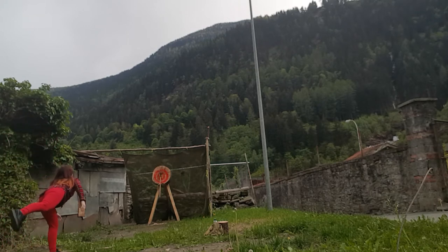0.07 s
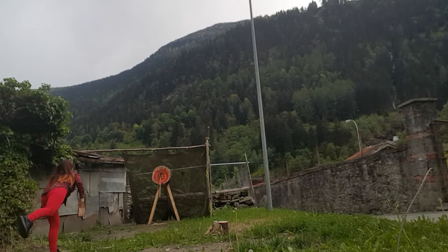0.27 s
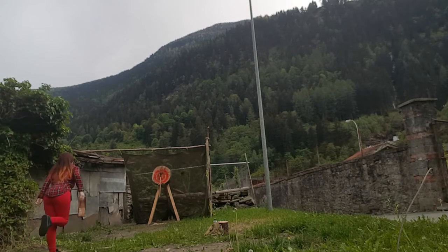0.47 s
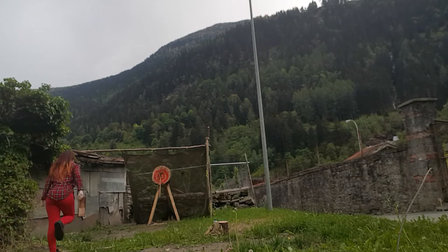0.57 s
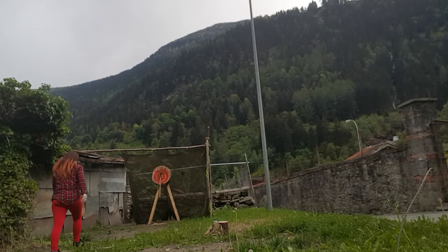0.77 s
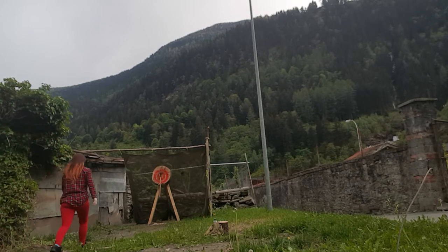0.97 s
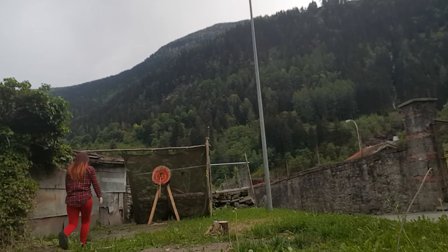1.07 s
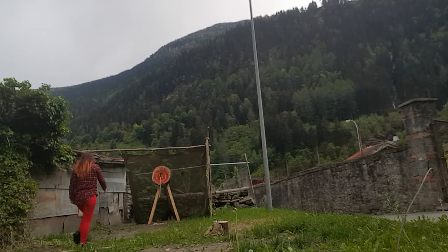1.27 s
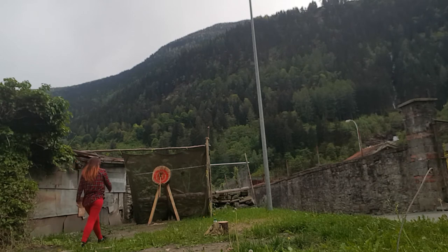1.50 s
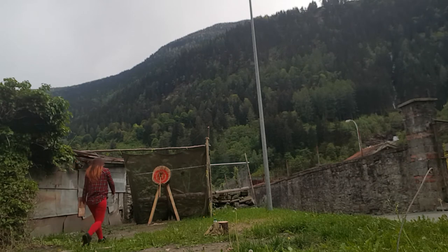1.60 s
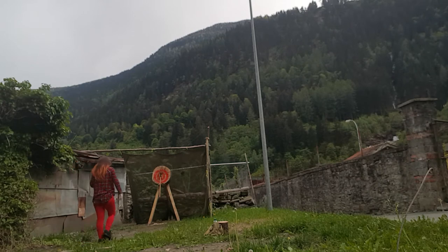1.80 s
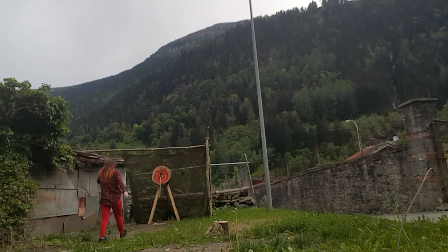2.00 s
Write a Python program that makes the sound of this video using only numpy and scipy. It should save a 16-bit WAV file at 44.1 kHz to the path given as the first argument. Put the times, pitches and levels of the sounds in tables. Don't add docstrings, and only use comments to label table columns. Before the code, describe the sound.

Hard woody thunk of an axe biting into a log target in a quiet open garden

```python
import sys
import numpy as np
from scipy import signal
from scipy.fft import rfft, irfft
from scipy.io import wavfile
from scipy.ndimage import uniform_filter1d

SR = 44100
rng = np.random.default_rng(int(sys.argv[2]) if len(sys.argv) > 2 else 0)


def nominal_scale(level):
    x = np.asarray(level, float) / 20
    return 10 ** x


def file_out(sig):
    cols = np.atleast_2d(sig).T
    lim = np.clip(cols, -1, 1)
    pcm = np.round(lim * 32767).astype(np.int16)
    wavfile.write(sys.argv[1], SR, pcm)


N = 90404


def evened(x):
    return x / np.sqrt(np.mean(x ** 2) + 1e-20)


def read(points, hz):
    f, value = np.transpose(points)
    return np.interp(np.log(hz + 1), np.log(f + 1), value)


def since(start_s):
    return np.maximum(np.arange(N) / SR - start_s, 0)


def ring(start_s, level_db, pitch_hz, t60_s, rise_s):
    t = since(start_s)
    decay = nominal_scale(level_db - 60 * t / t60_s)
    rise = 1 - np.exp(-t / rise_s)
    return -decay * rise * np.sin(2 * np.pi * pitch_hz * t)


def panned(difference_db):
    return nominal_scale([[difference_db / 2], [-difference_db / 2]])


def hiss(colour, same):
    mono_below_hz = 500
    a, b = rfft(rng.standard_normal((2, N)))
    hz = np.fft.rfftfreq(N, 1 / SR)
    same = 1 - (1 - same) * hz ** 2 / (hz ** 2 + mono_below_hz ** 2)
    right = same * a + np.sqrt(1 - same ** 2) * b
    return evened(irfft(np.array([a, right]) * nominal_scale(read(colour, hz)), N))


def wash():
    # hz, level_db (per Hz)
    colour = [(25, -15), (60, -6.5), (200, -6.5), (400, 0), (2300, -4), (4500, -21.5), (7000, -35.5),
              (16000, -49.5)]
    # hz, likeness (0 to 1)
    likeness = [(60, 0.98), (250, 0.91), (600, 0.42), (1400, 1), (3000, 0.32), (6000, 0.26), (12000, .05)]
    # hz, lead_rad
    lead = [(200, 0.0), (520, -0.7), (1120, 1.5), (1890, 2), (3190, 4), (5340, 7.5)]
    # hz, difference_db
    balance = [(60, 0), (150, 2), (380, -0.5), (950, 3), (2380, 3.5), (5980, 5.5), (15000, -3.5)]
    wash_db, swell_db, patch_db = -49, 0.28, 0.1

    frames, hz = N // 256 + 5, np.fft.rfftfreq(1024, 1 / SR)
    a, b, c, d, patches = rng.standard_normal((frames, 513, 5)).T
    patches = uniform_filter1d(patches, size=10, axis=0)
    patches = evened(uniform_filter1d(patches, size=12, axis=1))
    swell = evened(uniform_filter1d(rng.standard_normal(frames), size=24))

    same = np.clip(read(likeness, hz), 0, 1)[:, None]
    left = a + 1j * b
    delayed = left * np.exp(-1j * read(lead, hz))[:, None]
    right = same * delayed + np.sqrt(1 - same ** 2) * (c + 1j * d)
    pan = nominal_scale(read(balance, hz) / 2)[:, None]
    level_db = read(colour, hz)[:, None] + patch_db * patches + swell_db * swell
    z = np.array([left * pan, right / pan]) * nominal_scale(level_db)
    return nominal_scale(wash_db) * evened(signal.istft(z, nperseg=1024, noverlap=768)[1][:, :N])


def bird():
    # start_s, length_s, level_db, start_hz, end_hz
    whistles = [
        (1.12, .02, -63, 2450, 2450),
        (1.16, .18, -62, 2300, 2230),
        (1.605, .025, -62, 2400, 2400),
        (1.64, .02, -63, 2600, 2600),
        (1.68, .09, -65, 2280, 2260),
    ]
    out = np.zeros(N)
    waver = 1 + 0.4 * evened(uniform_filter1d(rng.standard_normal(N), size=300))
    for start_s, length_s, level_db, start_hz, end_hz in whistles:
        u = np.minimum(since(start_s) / length_s, 1)
        phase = 2 * np.pi * np.cumsum(start_hz + (end_hz - start_hz) * u) / SR
        out += nominal_scale(level_db) * np.sin(np.pi * u) ** 0.7 * np.sin(phase)
    return np.sqrt(2) * out * waver * panned(3)


def twig():
    # start_s, level_db
    ticks = [
        (.8495, -62),
        (.8641, -47),
        (.8680, -61),
        (.887, -65),
    ]
    # pitch_hz, level_db, t60_s
    modes = [(2300, -7, .03), (4800, 11, .006), (10300, 2, .005), (12600, 5, .005), (14500, -1, .004)]
    # hz, level_db (per Hz)
    splinters = [(2000, -20), (4500, 0), (8000, -1), (13000, 0), (16000, -2)]
    rise_s, dust_db, dust_t60_s = 0.0008, -3, 0.011

    snaps, puffs = np.zeros(N), np.zeros(N)
    for start_s, tick_db in ticks:
        for pitch_hz, level_db, t60_s in modes:
            snaps += ring(start_s, tick_db + level_db, pitch_hz, t60_s, rise_s)
        t = since(start_s)
        puffs += (1 - np.exp(-t / rise_s)) * nominal_scale(tick_db + dust_db - 60 * t / dust_t60_s)
    return (snaps + puffs * hiss(splinters, 0.82)) * panned(3)


def wall_echo():
    # hz, level_db (per Hz)
    colour = [(40, -16), (70, 2), (130, -3.5), (500, -0.5), (1000, -4), (2300, -16), (6000, -55)]
    wall_db, centre_s, spread_s = -45.5, 0.297, 0.016
    swell = np.exp(-0.5 * ((np.arange(N) / SR - centre_s) / spread_s) ** 2)
    return nominal_scale(wall_db) * swell * hiss(colour, 0.29)


def garden_scatter():
    # hz, level_db (per Hz)
    colour = [(60, -5.5), (200, 4.5), (500, 2), (1500, -4.5), (3000, -14), (6000, -29), (9000, -38),
              (16000, -48)]
    scatter_db, t60_s, rise_s = -31.5, 0.19, 0.0033
    t = since(0.2004)
    return (1 - np.exp(-t / rise_s)) * nominal_scale(scatter_db - 60 * t / t60_s) * hiss(colour, 0.36)


def tearing_fibres():
    # hz, level_db (per Hz)
    colour = [(200, -16), (1000, 4), (2500, -8), (4500, -7), (6000, -21), (9000, -30.5), (16000, -32)]
    start_s, hold_s = 0.2004, 0.0024
    crunch_db, t60_s = -38.5, 0.023
    decay = nominal_scale(crunch_db - 60 * since(start_s + hold_s) / t60_s)
    return (since(start_s) > 0) * decay * hiss(colour, 1)


def knocks(lag_s):
    # start_s, level_db, pitch_hz, t60_s
    blows = [(.2004, -32, 1500, .008), (.2005, -45, 5300, .01), (.2005, -53, 8800, .004),
             (.2006, -52, 14000, .007), (.2013, -32, 480, .035), (.2043, -31, 470, .04),
             (.2016, -36, 2400, .014), (.2010, -44, 3900, .012), (.2045, -33, 2100, .014),
             (.2054, -36, 4200, .018), (.2058, -29, 2000, .008), (.2058, -36, 5050, .012),
             (.2066, -32, 880, .012), (.2076, -31, 385, .025), (.2085, -33, 260, .03),
             (.2078, -16, 1200, .0055), (.2096, -23, 1950, .009), (.2102, -21, 400, .013),
             (.2127, -24, 1620, .024), (.2132, -40, 2950, .015), (.2137, -27, 1300, .006),
             (.2165, -28, 525, .05), (.2185, -33, 1800, .02), (.2215, -38, 2200, .02),
             (.2245, -36, 260, .03), (.2255, -48, 3900, .015), (.2275, -34, 560, .04), (.262, -53, 68, .35),
             (.289, -48, 500, .12)]
    rise_cycles = 0.15
    return sum(ring(start_s + lag_s, level_db + 2.5, pitch_hz, t60_s, rise_cycles / pitch_hz)
               for start_s, level_db, pitch_hz, t60_s in blows)


def ringing_wood(lag_s):
    # pitch_hz, level_db, t60_s
    modes = [(67.4, -45, 0.27), (108, -50, 0.033), (203, -36, 0.099), (273, -65, 0.088), (465, -27, 0.07),
             (543.5, -40, .09), (762, -29, 0.054), (834, -37, 0.092), (1093, -45, 0.18), (1430, -49, 0.036),
             (1960, -54, 0.055), (2390, -36, 0.057), (2770, -68, 0.052), (4250, -43, 0.032)]
    start_s, rise_s = 0.206, 0.004
    return sum(ring(start_s + lag_s, level_db, pitch_hz, t60_s, rise_s)
               for pitch_hz, level_db, t60_s in modes)


def axe():
    left_lag_s = 0.0001
    ports = [knocks(lag_s) + ringing_wood(lag_s) for lag_s in (left_lag_s, 0)]
    return np.array(ports) * panned(2)


def scene():
    surroundings = wash() + bird() + twig()
    blow = axe() + tearing_fibres() + garden_scatter() + wall_echo()
    return surroundings + blow


def low_pass(x):
    return signal.sosfilt(signal.butter(12, 16390, fs=SR, output="sos"), x)


def record(dry):
    # hz, level_db (per Hz)
    mic_colour = [(1000, -1), (6000, -6), (10000, -7), (12500, -1.5), (15800, -0.5)]
    mic_hiss_db, low_cut_hz, edge_hz = -73, 44.6, 15800
    heard = dry + nominal_scale(mic_hiss_db) * hiss(mic_colour, 0.071)
    heard = signal.sosfilt(signal.butter(4, low_cut_hz, "high", fs=SR, output="sos"), heard)
    edge = signal.firwin(511, edge_hz, window=("kaiser", 9), fs=SR)
    mix = signal.oaconvolve(heard, edge[None], "same")
    return low_pass(mix)


dry = scene()
out = record(dry)
file_out(out)
```